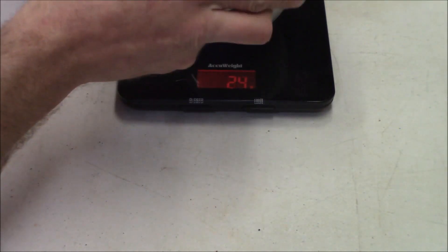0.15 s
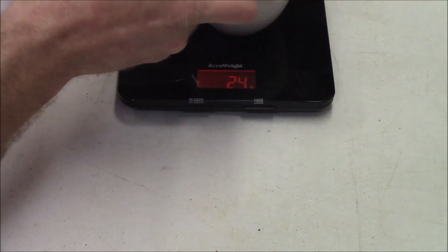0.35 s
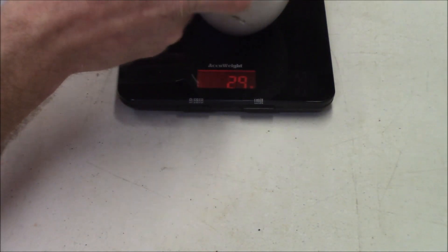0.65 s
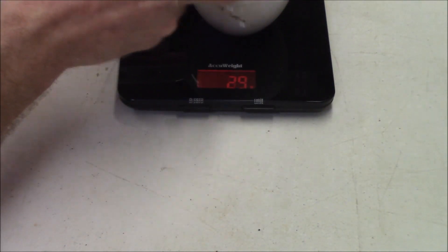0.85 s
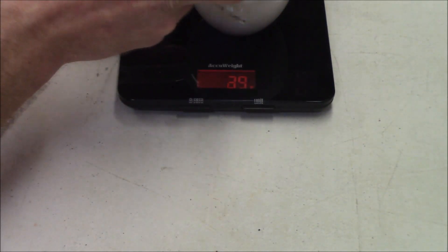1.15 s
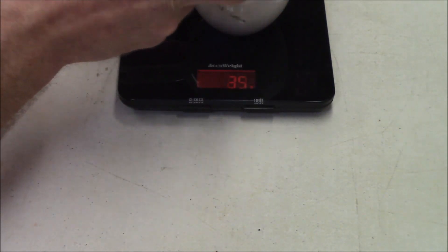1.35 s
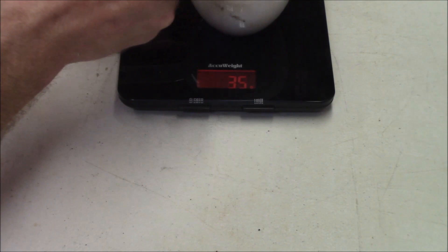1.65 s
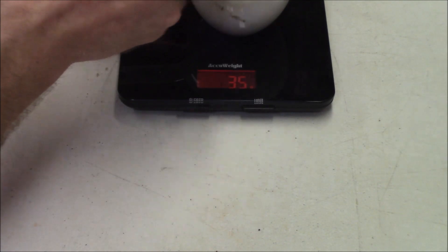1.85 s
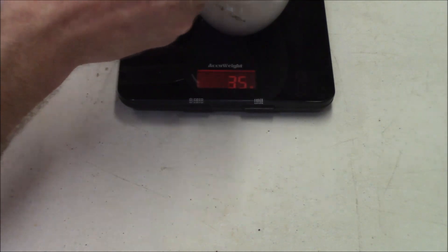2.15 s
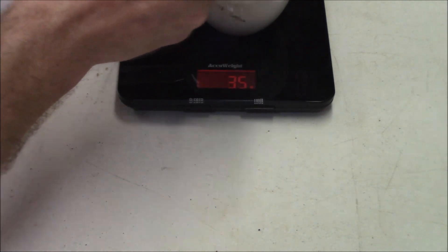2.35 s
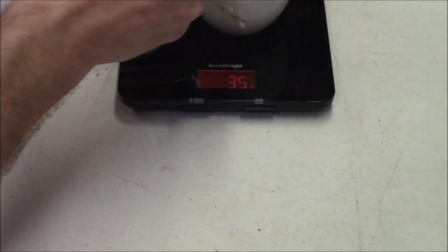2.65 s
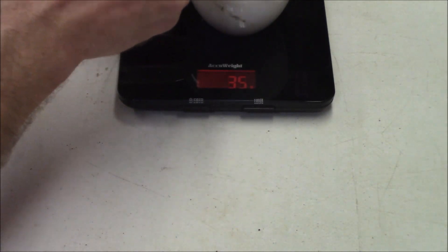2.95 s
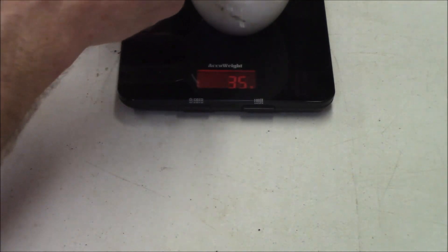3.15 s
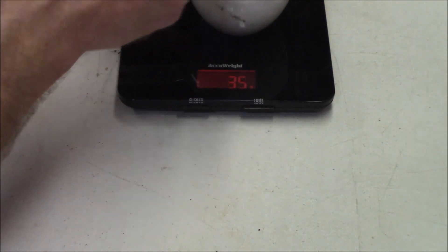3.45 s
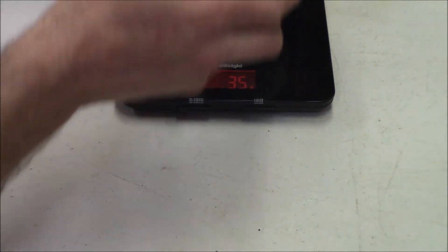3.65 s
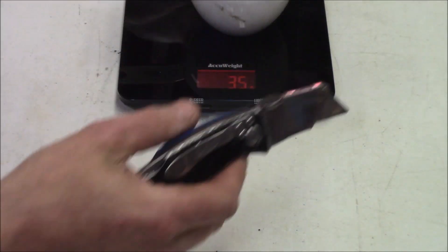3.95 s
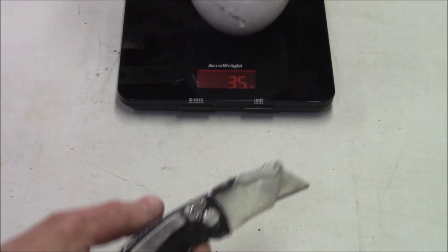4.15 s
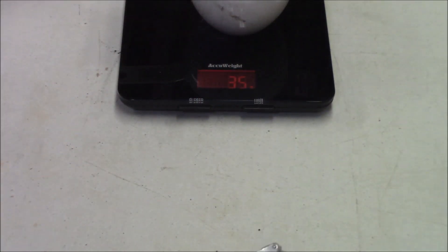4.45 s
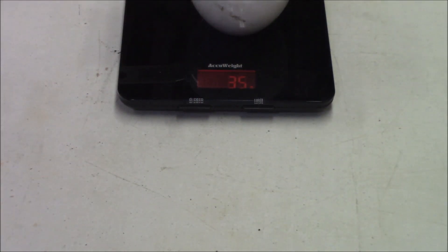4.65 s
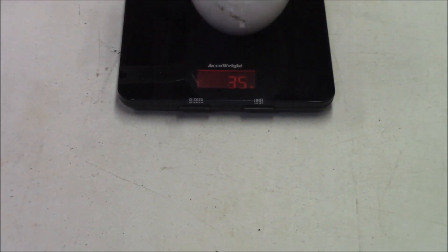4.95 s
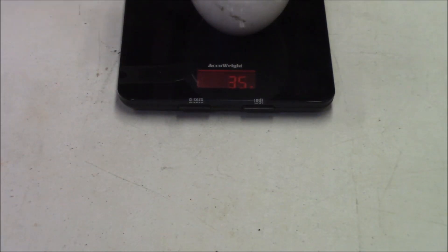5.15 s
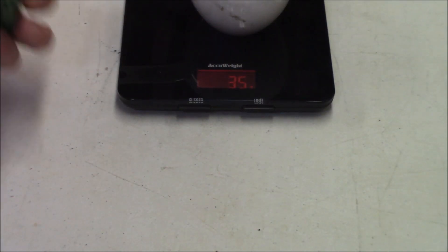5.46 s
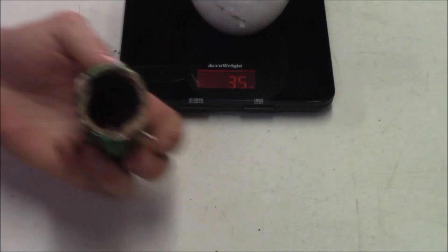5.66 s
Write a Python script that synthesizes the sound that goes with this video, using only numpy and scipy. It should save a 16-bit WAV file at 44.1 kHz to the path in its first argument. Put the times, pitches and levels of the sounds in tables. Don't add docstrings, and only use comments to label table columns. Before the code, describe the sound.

Quick hollow taps with a steely click, a few bright pellet pings early, a quiet gap, then handling rustle and heavy table thumps.

```python
import sys
import numpy as np
from scipy import signal
from scipy.fft import rfft, irfft, next_fast_len
from scipy.io import wavfile
from scipy.ndimage import map_coordinates

SR = 44100
rng = np.random.default_rng(int(sys.argv[2]) if len(sys.argv) > 2 else 0)


def transcribe(u):
    v = np.clip(np.atleast_2d(u).T, -1, 1)
    q = np.round(v * 32767).astype(np.int16)
    wavfile.write(sys.argv[1], SR, q)


def attenuation_scalar(level_db):
    decades = np.asarray(level_db, float) / 20
    return 10 ** decades


N = 256662
LEAD = 64


def unit(x):
    return x / np.sqrt(np.mean(x ** 2) + 1e-20)


def along(points, hz):
    f, v = np.transpose(points)
    return np.interp(np.log(hz + 1), np.log(f + 1), v)


def filtered(x, response):
    m = next_fast_len(x.shape[-1] + 4096)
    spectrum = rfft(x, m) * response(np.fft.rfftfreq(m, 1 / SR))
    return irfft(spectrum, m)[..., :x.shape[-1]]


def colour(points):
    return lambda hz: attenuation_scalar(along(points, hz))


def modes(table):
    def response(f):
        total = 0
        for k, (centre_hz, width_hz, level_db) in enumerate(table):
            damping = 1j * f * width_hz
            total = total + (-1) ** k * attenuation_scalar(level_db) * damping / (centre_hz ** 2 - f * f + damping)
        return total
    return response


def burst(response, t60_s, rise_s, noisy=1.0, size=4096):
    t = np.arange(size) / SR
    force = (1 - np.clip(noisy, 0, 1)) * 4 + noisy * rng.standard_normal(size)
    force = force * attenuation_scalar(-60 * t / t60_s) * (1 - np.exp(-t / rise_s))
    click = np.linalg.norm(force) * (t == 0)
    send = force if noisy < 1 else click
    sound = filtered(np.pad([force, send], ((0, 0), (LEAD, 0))), response)
    if noisy < 1:
        return sound / np.abs(sound[0]).max()
    return sound / (np.linalg.norm(sound[1]) / 3)


def add(track, start_s, sound):
    i = max(round(start_s * SR) - LEAD, 0)
    track[:, i:i + sound.shape[1]] += sound[:, :N - i]


# hz, level_db
AIR_COLOUR = [(12, -89), (20, -6.5), (60, 1), (170, -10.5), (266, -7), (307, -9.5), (395, -7.5),
              (442, -6.5), (2080, -19.5), (2330, -19.5), (9500, -30.5), (15300, -33.5), (16700, -46)]
# hz, level_db
AIR_SIDE = [(60, -9), (110, -8), (200, -4), (380, -7.5), (700, -7), (1290, -6), (2380, -8.5), (4400, -9.5),
            (8120, -9), (15000, -15.5)]


def air():
    mid, side = filtered(rng.standard_normal((2, N)), colour(AIR_COLOUR))
    gain = attenuation_scalar(-56.5) / np.std(mid)
    whine = attenuation_scalar(-89) * np.sin(2 * np.pi * 11030 * np.arange(N) / SR)
    return gain * mid + whine, gain * filtered(side, colour(AIR_SIDE))


# start_s, length_s, hiss_db, rub_db (against hiss)
MOVES = [(0.12, 0.4, -45, -9), (3.607, 0.15, -51, -12), (3.66, 0.63, -54.5, -5), (4.022, 0.31, -62.5, 11),
         (4.315, 0.12, -82, 3.5), (4.827, 0.49, -62, 7.5), (4.55, 0.23, -76, 8), (5.086, 0.4, -52, -9),
         (5.291, 0.28, -55.5, -14), (5.416, 0.12, -46, -1), (5.458, 0.37, -47.5, 5.5),
         (5.677, 0.064, -40, -12)]
# time_s, level_db
ROLLING = [(0.0, -90.5), (0.136, -28.5), (0.256, -50), (0.634, -39), (0.83, -46), (0.912, -50), (1.05, -44)]
# hz, density_db_per_hz
HISS = [(1180, 8), (2000, 3), (2950, -6), (6470, -4), (9980, -11), (15600, -56.5), (16500, -47)]
# hz, density_db_per_hz
RUB = [(30, -26.5), (60, -16.5), (150, 4), (300, -14.5), (600, -32.5), (1500, -52.5)]
# centre_hz, width_hz, level_db
TUBE = [(818, 458, 17.5), (480, 820, 1)]


def rustle(cloth_db, rattle_db):
    t = np.arange(N) / SR
    rise_share, grain = 0.35, 300
    hiss, rub = np.zeros(N), np.zeros(N)
    for start_s, length_s, hiss_db, rub_db in MOVES:
        corners_s = [start_s, start_s + rise_share * length_s, start_s + length_s]
        swell = attenuation_scalar(hiss_db) * np.sin(np.pi / 2 * np.interp(t, corners_s, [0, 1, 0])) ** 2
        hiss += swell
        rub += attenuation_scalar(rub_db) * swell
    time_s, level_db = np.transpose(ROLLING)
    rolling = np.clip((time_s[-1] - t) / 0.06, 0, 1) * attenuation_scalar(np.interp(t, time_s, level_db))
    layers = [(hiss, colour(HISS), cloth_db), (rub, colour(RUB), cloth_db), (rolling, modes(TUBE), rattle_db)]
    out = np.zeros(N)
    for level, shape, grain_db in layers:
        clumps = map_coordinates(rng.standard_normal(N // grain + 4), [np.arange(N) / grain])
        out += level * unit(attenuation_scalar(grain_db * clumps) * filtered(rng.standard_normal(N), shape))
    return out


# start_s, peak_db
TICKS = [(0.0044, -36.5), (0.4325, -30), (0.6479, -44), (0.669, -36.5), (0.709, -45), (2.158, -24.5),
         (2.773, -34), (3.0984, -26), (3.403, -35.5), (3.679, -45), (5.1652, -44), (5.1869, -44),
         (5.471, -45), (5.5745, -49), (5.6012, -49), (5.6908, -31.5)]
LIFTS = [1.0763, 1.2438, 1.4362, 1.633, 1.838, 2.0478, 2.2535, 2.445, 2.9043, 3.1946]
# hz, density_db_per_hz
SCUFF = [(800, -5.5), (1500, -1), (3500, 1.5), (6500, -9), (9000, -15.5), (16000, -21.5)]
# hz, density_db_per_hz
PING = [(1760, -24.5), (3000, -38), (4020, -8.5), (5420, -2), (5910, 0.5), (6910, 2.5), (14500, -16),
        (15500, -47.5), (16500, -77.5)]


def ticks():
    out = np.zeros((2, N))
    lifts = [(start_s, -39, -25) for start_s in LIFTS]
    others = [(start_s, peak_db, -8.5) for start_s, peak_db in TICKS]
    for start_s, peak_db, bright_db in lifts + others:
        add(out, start_s, attenuation_scalar(peak_db + 5.5) * burst(colour(SCUFF), 0.04, 0.00048))
        add(out, start_s, attenuation_scalar(peak_db + bright_db + 9.5) * burst(colour(PING), 0.0066, 0.0001))
    return out


# start_s, weight_db, flat_db (against weight), edge_db (against weight)
THUDS = [
    (1.468, -41, 0, -36),
    (4.86, -47.5, -24.5, -29),
    (5.431, -15.5, -2.5, 0),
    (5.441, -25.5, 13.5, -10),
    (5.456, -26.5, 0, -20),
    (5.7, -12.5, -14.5, -29.5),
    (5.7207, -7, 4, 9),
    (5.743, -10.5, 8, -45),
    (5.758, -21.5, 8.5, -21),
    (5.8, -24, -6, -30),
]
# centre_hz, width_hz, level_db
BOOM = [(135, 23, 4.5), (157.7, 71, -1.5), (260.2, 21, -2.5)]
# centre_hz, width_hz, level_db
PLATE = [(316.3, 190, -1.9), (490, 220, -0.64)]
# hz, density_db_per_hz
KNOCK = [(300, -31.5), (600, 6.5), (1000, 1), (1400, 5), (1800, -1.5), (2600, -10), (3700, -7.5),
         (5000, -24.5), (9000, -52.5)]
# centre_hz, width_hz, level_db
EDGE = [(3730, 160, 10), (1410, 63, -27)]
# hz, density_db_per_hz
CLATTER = [(1180, -40), (2000, -9), (3520, -20.5), (4310, -7.5), (6360, -4.5), (9980, -10), (14700, -20),
           (15900, -22.5), (16500, -67)]


def thuds():
    out = np.zeros((2, N))
    lower, upper = modes(PLATE[:1]), modes(PLATE[1:])
    for start_s, weight_db, flat_re_db, edge_re_db in THUDS:
        flat_db, edge_db = weight_db + flat_re_db, weight_db + edge_re_db
        add(out, start_s, attenuation_scalar(weight_db) * burst(modes(BOOM), 0.017, 0.001, noisy=0.059))
        add(out, start_s, attenuation_scalar(flat_db) * burst(lower, 0.0014, 0.00031, noisy=0.11))
        add(out, start_s, attenuation_scalar(5.4 * flat_db - 5) * burst(upper, 0.0042, 0.00034, noisy=0.12))
        add(out, start_s, attenuation_scalar(edge_db) * burst(colour(KNOCK), 0.04, 0.00026))
        add(out, start_s, attenuation_scalar(edge_db - 17.5) * burst(modes(EDGE), 0.016, 0.0004))
        add(out, start_s, attenuation_scalar(1.8 * edge_db - 12) * burst(colour(CLATTER), 0.011, 0.000076))
    return out


# start_s, peak_db, ring_db (against peak)
PELLETS = [(0.2073, -11, -10), (0.2292, -2, -3.5), (0.2453, -8, -12), (0.4697, -8, -3), (0.4872, -7.5, -9),
           (0.5264, -14.5, -8), (0.594, -17.5, -10), (0.6807, -28, 1), (0.7246, -2, -12.5),
           (0.7966, -25, 4), (0.8141, -7.5, -1.5), (0.8894, -24.5, -3)]
# centre_hz, width_hz, level_db
BOWL = [(5280, 250, -17), (6770, 40, 2), (7350, 120, -16), (8230, 100, -18), (8850, 250, -17),
        (11400, 300, -20)]


def pellets():
    out = np.zeros((2, N))
    for start_s, peak_db, ring_db in PELLETS:
        add(out, start_s, attenuation_scalar(peak_db - 7.5) * burst(colour(PING), 0.037, 0.00016))
        add(out, start_s, attenuation_scalar(peak_db + ring_db - 4) * burst(modes(BOWL), 0.006, 0.0002))
        add(out, start_s, attenuation_scalar(0.37 * peak_db - 25) * burst(colour(KNOCK), 0.017, 0.00055))
    return out


# start_s, knock_db (peak), wall_db (against knock), blade_db (against knock)
RAPS = [(0.06, -3.5, -23.5, -11), (0.327, -4.5, -22.5, -15), (0.536, -13.5, -17.5, -3.5),
        (0.742, -14, -23, -7.5), (0.919, -11, -19, -9), (1.113, -13.5, -15.5, -9),
        (1.299, -6, -20.5, -10.5), (1.501, -5.5, -15, -9), (1.698, -7, -16.5, -10),
        (1.906, -11, -14.5, -6.5), (2.105, -13, -15.5, -5.5), (2.325, -14.5, -11.5, -6),
        (2.522, -12.5, -11.5, -5), (2.685, -13, -11.5, -3), (2.802, -17, -11, -0.5),
        (2.945, -15.5, -15.5, -5.5), (3.052, -19, -17, 1), (3.237, -11.5, -20, -3.5),
        (3.446, -7, -18, -5.5)]
# centre_hz, width_hz, level_db
HOLLOW = [(149, 72, 0.5), (327.6, 150, 3), (420.5, 99, 7), (528, 390, -18)]
# centre_hz, width_hz, level_db
WALL = [(1333, 152, 6), (1773, 45, 10.5), (2485, 460, 1)]
# centre_hz, width_hz, level_db
BLADE = [(3526, 810, 4), (5070, 670, -5)]
# hz, density_db_per_hz
SNAP = [(1500, -33), (4000, -9), (8000, -3), (13000, 5.5), (15900, -16), (16500, -58)]
# centre_hz, width_hz, level_db
STEEL = [(3560, 55, -9.5), (3630, 27, -13), (3705, 39, 12)]
# centre_hz, width_hz, level_db
SCALE = [(448.4, 22.4, -1.5), (578, 28.4, -2.5), (896, 23, -21.5)]
SCALE_SEND = [
    [1],
    [.4],
]


def raps():
    out = np.zeros((2, N))
    for start_s, knock_db, wall_db, blade_db in RAPS:
        parts = [(wall_db + 9.5, modes(WALL)),
                 (blade_db + 1.0, modes(BLADE)),
                 (blade_db + 4, colour(CLATTER))]
        chatter = lambda f: np.sqrt(sum(np.abs(attenuation_scalar(level_db) * part(f)) ** 2 for level_db, part in parts))
        effort_db = 10 * np.log10(np.mean(chatter(np.linspace(500, 16000, 200)) ** 2))
        pan = [(hz, width_hz, db + 3 * rng.standard_normal()) for hz, width_hz, db in SCALE]
        pitch = 0.98 + (1.028 - 0.98) * np.exp(-start_s / 1.0)
        knock = lambda f: modes(TUBE)(f / pitch) ** 2
        hollow_db = 0.56 * knock_db
        snap_db = knock_db + blade_db - 1 + 4 * (knock_db > -12)
        steel_db = knock_db + 2.7 * blade_db - 4
        pan_gain = attenuation_scalar(hollow_db - 13) * np.array(SCALE_SEND)

        add(out, start_s - 0.0015, attenuation_scalar(knock_db - 28) * burst(colour(CLATTER), 0.008, 0.0004))
        add(out, start_s - 0.0004, attenuation_scalar(knock_db + 0.3) * burst(knock, 0.00078, 0.000067, noisy=0.2))
        add(out, start_s + 0.00074, attenuation_scalar(hollow_db - 14) * burst(modes(HOLLOW), 0.0007, 0.00041, noisy=0.15))
        add(out, start_s + 0.00058, attenuation_scalar(knock_db + effort_db + 15.0) * burst(chatter, 0.046, 0.00055))
        add(out, start_s + 0.0005, attenuation_scalar(snap_db) * burst(colour(SNAP), 0.005, 0.0001))
        add(out, start_s + 0.000886, attenuation_scalar(steel_db) * burst(modes(STEEL), 0.0072, 0.0003))
        add(out, start_s + 0.00803, pan_gain * burst(modes(pan), 0.015, 0.0015, noisy=0.43))
    return out


# hz, t60_s
ROOM = [(100, 0.09), (300, 0.3), (700, 0.21), (2000, 0.21), (5000, 0.24), (13000, 0.16)]


def tail(delay_s):
    hz, t, z = signal.stft(rng.standard_normal(SR // 3), SR, nperseg=256)
    decay = attenuation_scalar(-60 * t / along(ROOM, hz)[:, None])
    h = signal.istft(z * decay, SR, nperseg=256)[1]
    h = h * (1 - np.exp(-np.arange(len(h)) / SR / delay_s))
    return h / np.linalg.norm(h)


def diffuse(x, size=8192):
    out = np.zeros(N + SR)
    for i in range(0, N, size):
        part = signal.fftconvolve(x[i:i + size], tail(0.0013))
        out[i:i + len(part)] += part
    return filtered(out[:N], lambda hz: (1j * hz / (220 + 1j * hz)) ** 2)


# delay_s, level_db
WALLS = [(.0042, -26), (.0086, -10.5), (.0134, -5.5), (0.0187, -7.5), (0.0229, -18.5), (0.043, -25),
         (.0522, -9.5)]
# hz, level_db
NEAR_SIDE = [(60, -27.5), (110, -38.5), (200, -28.5), (380, -26.5), (700, -22.5), (1290, -24.5),
             (2380, -14.5), (4400, -19), (8120, -14), (15000, -20)]
# hz, level_db
FAR_SIDE = [(60, -8.5), (110, -57.5), (200, -34), (380, -45), (700, -19), (1290, -17.5), (2380, -14.5),
            (4400, -12), (8120, -8), (15000, -18.5)]


def room(x, send, echo_db, tail_db):
    echoes = sum(attenuation_scalar(level_db) * np.pad(send, (round(delay_s * SR), 0))[:N] for delay_s, level_db in WALLS)
    echoes = filtered(echoes, lambda hz: 1 / (1 + 1j * hz / 2500) ** 2)
    mid = x + attenuation_scalar(echo_db) * echoes + attenuation_scalar(tail_db) * diffuse(send)
    spread = np.diff(rng.standard_normal(12) * np.hanning(12))
    turn = lambda hz: np.exp(1j * np.angle(signal.freqz(spread, worN=hz, fs=SR)[1]))
    near = filtered(x, lambda hz: turn(hz) * colour(NEAR_SIDE)(hz))
    far = filtered(diffuse(send), colour(FAR_SIDE))
    return mid, near + attenuation_scalar(tail_db - 2.0) * far


def scene():
    contacts = raps() + pellets() + ticks() + thuds()
    direct, send = contacts + attenuation_scalar(-5.0) * rustle(cloth_db=2.5, rattle_db=10.5)
    mid, side = np.array(room(direct, send, echo_db=-6.0, tail_db=-1.5)) + np.array(air())
    return np.array([mid + side, mid - side])


def band_limit(x):
    return signal.sosfilt(signal.butter(12, 16820, fs=SR, output="sos"), x)


def record(dry):
    bass_cut = lambda hz: (1j * hz / (85 + 1j * hz)) ** 3
    treble_cut = lambda hz: (hz < 16800) / (1 + (hz / 16000) ** 40)
    x = filtered(dry, lambda hz: bass_cut(hz) * treble_cut(hz))
    mix = x / (1 + np.abs(x / 0.99) ** 6) ** (1 / 6)
    return band_limit(mix)


dry = scene()
out = record(dry)
transcribe(out)
```